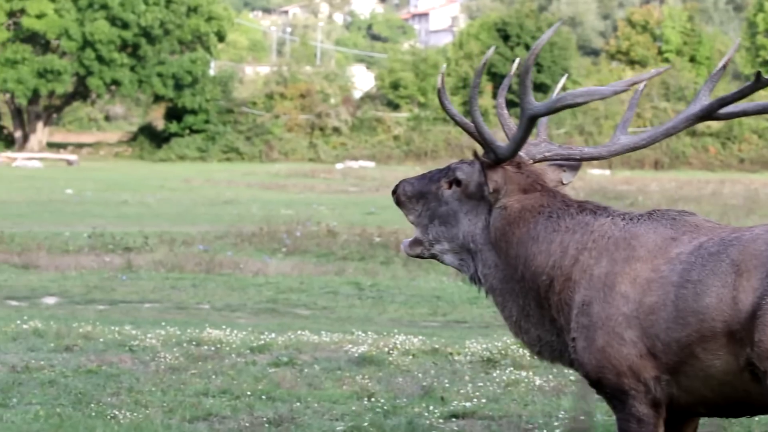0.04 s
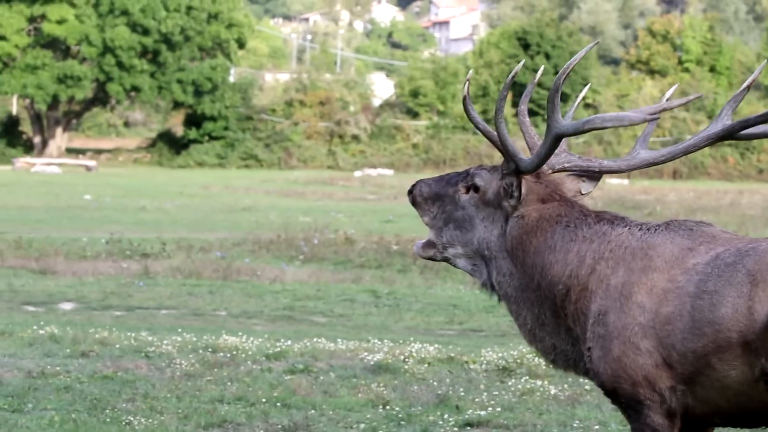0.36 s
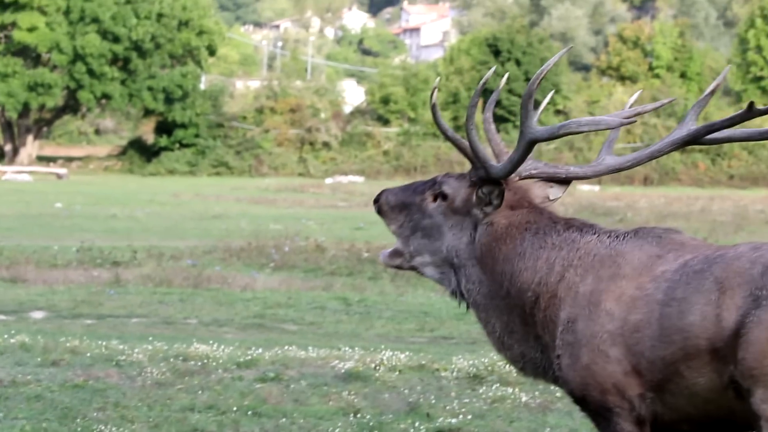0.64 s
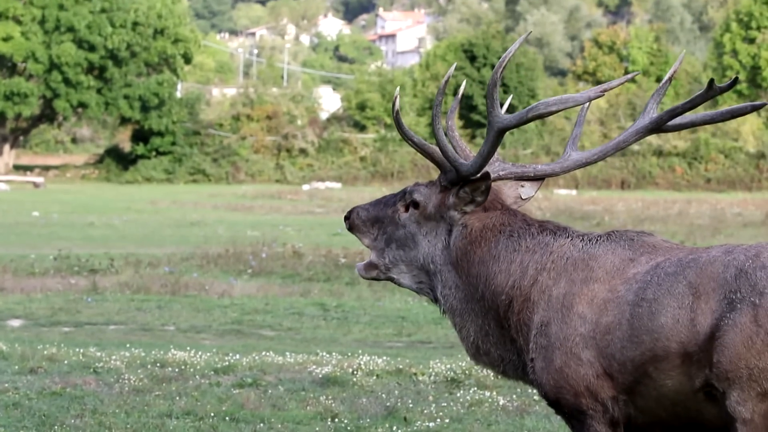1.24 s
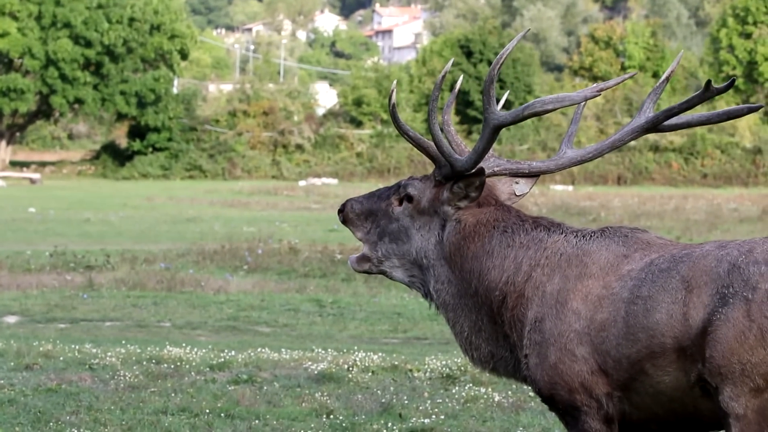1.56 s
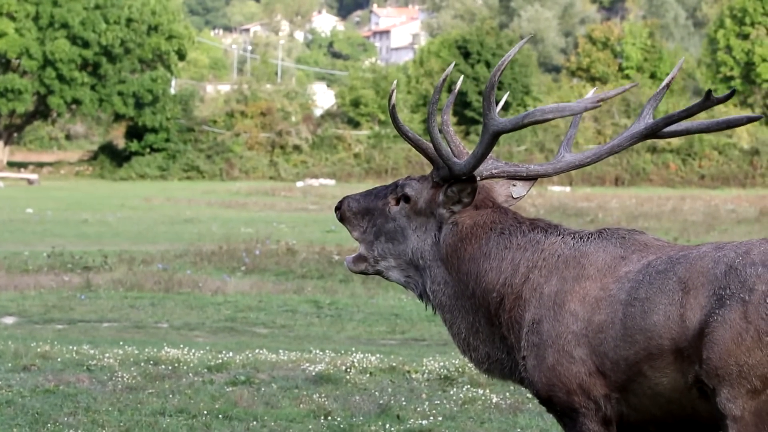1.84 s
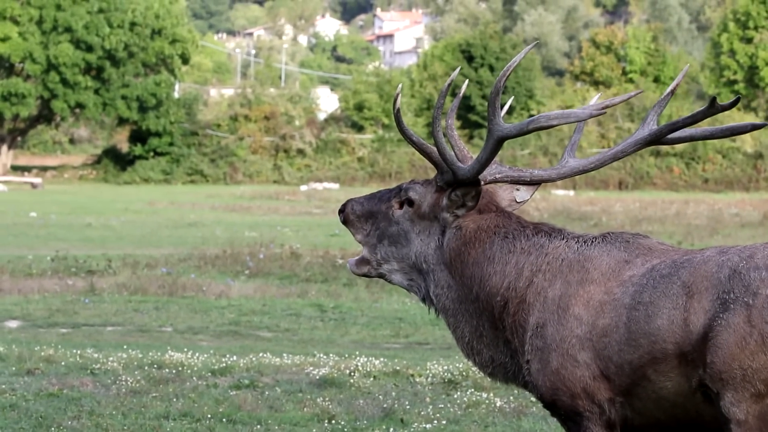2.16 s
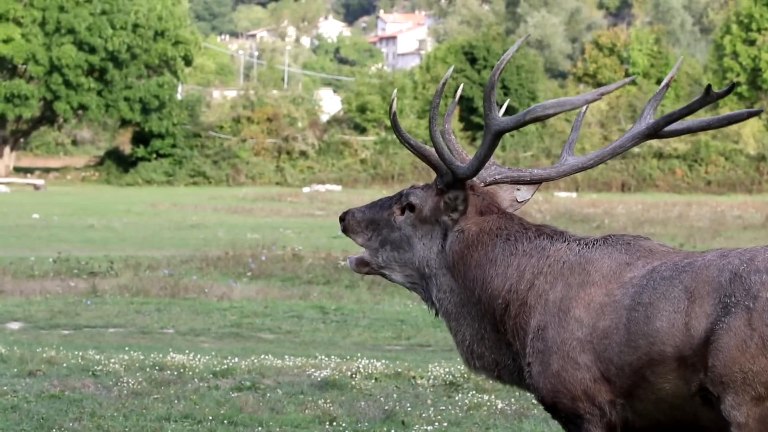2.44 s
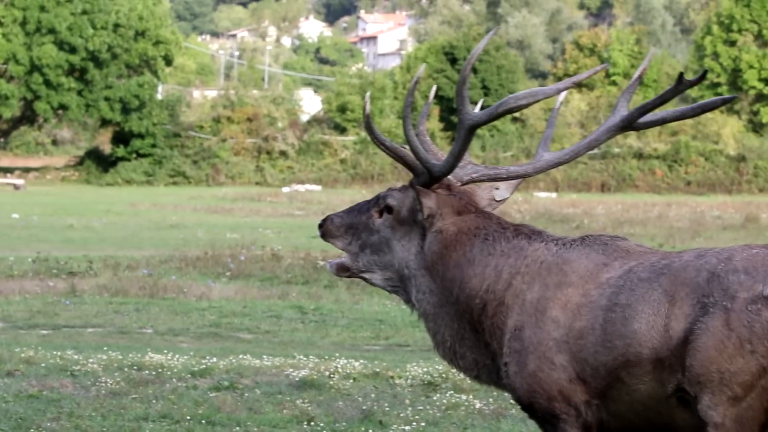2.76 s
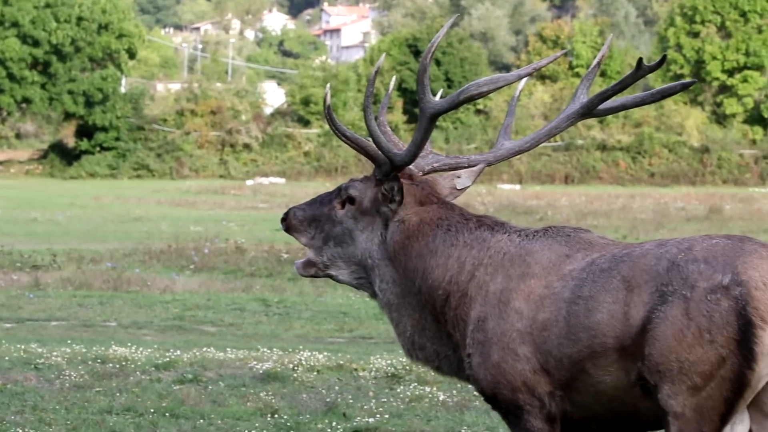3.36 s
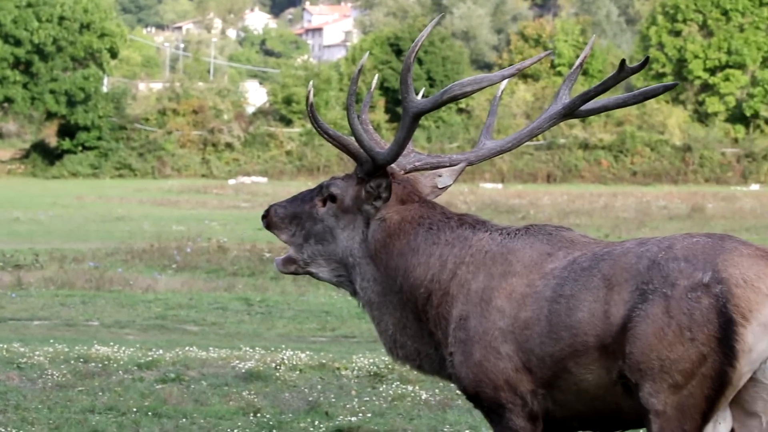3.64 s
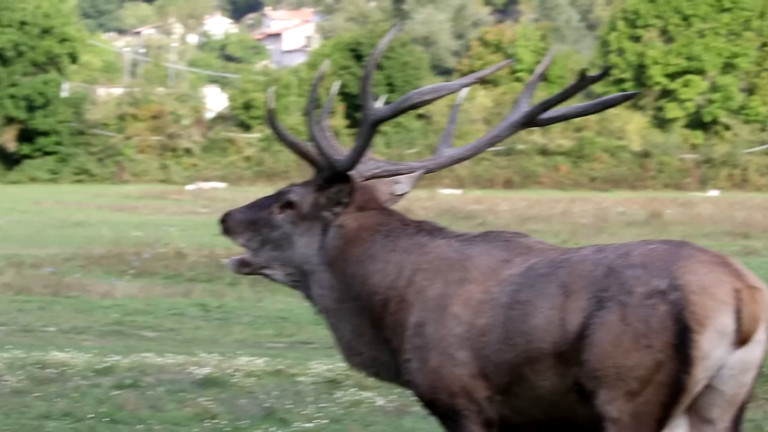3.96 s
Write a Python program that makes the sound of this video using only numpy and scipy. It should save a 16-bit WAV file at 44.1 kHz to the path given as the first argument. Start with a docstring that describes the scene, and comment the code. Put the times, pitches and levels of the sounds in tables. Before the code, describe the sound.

A stag close to the microphone gives three low, rough roars, each rising in pitch and sinking into a rattling grunt. They echo lightly across an open meadow, with faint birds and a soft wash of air behind.

```python
"""A red deer stag, close by and already in full voice, roars three times in an open meadow.
Source and filter: slow pulses of the vocal folds excite the resonances of a long throat, and each roar
arches in pitch and sinks into a rattling grunt. The wooded edge of the meadow echoes it. Small birds
whistle and chirp faintly, with two dry ticks and a far hoot, over the soft wash of still air."""
import sys
import numpy as np
from scipy import signal
from scipy.fft import rfft, irfft
from scipy.io import wavfile
from scipy.ndimage import uniform_filter1d

SR = 44100
rng = np.random.default_rng(int(sys.argv[2]) if len(sys.argv) > 2 else 0)


def transcribe(signal):
    """Save signal, clipped to [-1, 1], as a 16-bit WAV file at the path in sys.argv[1]."""
    frames = np.atleast_2d(signal).T
    limited = np.clip(frames, -1, 1)
    pcm = np.round(limited * 32767).astype(np.int16)
    wavfile.write(sys.argv[1], SR, pcm)


N = 176400
SIZE = 4096  # samples in the response to one pulse
HZ, T = np.fft.rfftfreq(SIZE, 1 / SR), np.arange(SIZE) / SR

# Pulse rate of the folds in each roar. Each row: time in seconds, pitch in Hz.
PITCH_1 = [(0, 94), (.256, 109.6), (.384, 113.1), (.468, 110.5), (.58, 98.9), (.7, 93.47), (.84, 90.78),
           (.885, 69.7), (.912, 58.1)]
PITCH_2 = [(1.242, 76.9), (1.298, 107.2), (1.338, 115.4), (1.44, 117), (1.61, 108.7), (1.75, 107.1),
           (1.97, 100.8), (2.062, 91.42), (2.234, 83.66), (2.335, 65.66)]
PITCH_3 = [(3.185, 77.7), (3.248, 112.2), (3.32, 114.9), (3.492, 104.1), (3.618, 99.23), (3.77, 101.1),
           (3.835, 87.23), (3.915, 57.4)]
# Loudness of each roar. Each row: time in seconds, then bass, middle and treble levels in dB.
LEVEL_1 = [(.05, -25, -24, -29.5), (0.239, -23.5, -20.5, -20.5), (.52, -23, -22.5, -21.5),
           (.62, -23, -24, -29.5), (0.871, -22, -24.5, -28.5)]
LEVEL_2 = [(1.4, -30.5, -25, -23), (1.559, -30.5, -21.5, -21.5), (1.899, -24, -22.5, -21),
           (2.08, -21.5, -24, -27.5), (2.31, -23.5, -23, -32)]
LEVEL_3 = [(3.35, -35.5, -31, -27), (3.481, -37.5, -27, -29), (3.59, -35, -26.5, -33.5),
           (3.81, -29, -24, -30), (3.88, -25, -29.5, -35.5)]
# Throat resonances in three postures. Each row: frequency in Hz, level within its band in dB.
STRETCHED = [(190, 5.5), (325, 0.5), (553, 0), (830, -11), (1000, -7.5), (1280, -9.5), (1600, 4.5),
             (1925, 6.5), (2250, -5.5), (2620, -5), (3020, -6.5), (3550, -22), (4100, -24.5)]
OPEN = [(215, -0.5), (330, -8), (680, 4.5), (900, 0), (1135, 1), (1440, -4), (1750, 3), (1900, 7),
        (2230, -5.5), (2630, -1), (3060, -6), (3600, -15.5), (4100, -15)]
SLACK = [(200, -3.5), (315, -9.5), (665, 4.5), (880, 3), (1190, 0), (1410, 4), (1610, -3), (1810, 4.5),
         (2220, -7.5), (2660, -1), (3000, -5.5), (3650, -14.5), (4100, -15.5)]

def stag():
    """Posture sets the formants: held in roar one, stretching in two, an upper pair falling in three."""
    raised = [(hz + 306 * (2500 < hz < 3400), db) for hz, db in SLACK]
    return (roar(PITCH_1, LEVEL_1, STRETCHED, STRETCHED, swell_s=.01, notch=.84)
            + roar(PITCH_2, LEVEL_2, OPEN, STRETCHED, change_s=(1.397, 2.06))
            + roar(PITCH_3, LEVEL_3, raised, SLACK, change_s=(3.3, 3.6), notch=.77))

def roar(pitch, level, first, last, change_s=(0, 1), swell_s=.17, notch=0):
    """Source-filter voice: each fold pulse and its puff of turbulent air ring the throat."""
    t = np.arange(pitch[0][0], pitch[-1][0], 1 / SR)
    cycles = np.cumsum(read(pitch, t)) / SR
    at = np.interp(np.arange(int(cycles[-1]) + 1), cycles, t)[:, None]  # pulse times
    hz, age = read(pitch, at), at - t[0]
    fry = vocal_fry(at, hz)
    power = throat(at, age, level, first, last, change_s, notch)
    breath = (.1 + .65 * fry) * np.sqrt(HZ / 1500)
    voice = minimum_phase(power) * (1 + breath * puffs(len(at), decay_s=.005)) / np.hypot(1, breath)
    swell = np.minimum((age + 1 / hz) / swell_s, 1)
    closing = amp(np.interp(at, (t[-1] - .047, t[-1]), (0, -14)))
    return pulse_train(voice * swell * closing + rasp(at), at, hz, fry)

def vocal_fry(at, hz, onset_hz=83.3, width_hz=1.78, breaks_s=(.56, 2.06, 2.2)):
    """The folds vibrate irregularly at low pitch and where the voice breaks: 0 is even, 1 is full fry."""
    slow = 1 / (1 + np.exp((hz - onset_hz) / width_hz))
    return np.maximum(slow, .35 * sum(moment(at, s) for s in breaks_s))

def pulse_train(spectra, at, hz, fry, jitter_s=.000373, shimmer_db=2.5, lag_s=.001775, lag_hz=960):
    """Superposition of the pulse responses; fry scatters their timing (jitter) and level (shimmer)."""
    lead = 256  # samples of room before each pulse
    place = abs(at + rng.standard_normal(at.shape) * jitter_s * fry ** 2) * SR
    lag_cycles = HZ * (place % 1 + lead) / SR
    # The treble rings as the folds close, just after the bass push.
    lag_cycles += lag_s * (HZ - lag_hz * np.arctan(HZ / lag_hz))
    gain = np.sqrt(SR / hz) * amp(rng.standard_normal(at.shape) * shimmer_db * fry)
    pulses = irfft(spectra * gain * np.exp(-2j * np.pi * lag_cycles))
    out = np.zeros(N + lead)
    for sample, pulse in zip(place.ravel(), pulses * signal.windows.tukey(SIZE, lead / SIZE)):
        add(out, int(sample) / SR, pulse)
    return out[lead:]

# Damping of the throat resonances, lowest first. Each entry: bandwidth in Hz.
BANDWIDTHS = np.array([81.6, 85.6, 85.3, 151, 119, 91, 129, 115.6, 176, 90, 192, 360, 269])
# Brief sharp ringing of the shifting throat. Each row: time in seconds, frequency in Hz, boost in dB.
RINGS = [(.53, 838, 7), (.77, 1276, 3.5), (1.55, 1125, 9), (1.648, 2572, 8), (1.999, 3171, 16.5),
         (2.241, 597, 9), (3.31, 1784, 8.5)]

def throat(at, age, level, first, last, change_s, notch):
    """Resonance of an air column: its power response at each pulse, moving between two postures."""
    blend = np.interp(at, change_s, (0, 1))
    tuning = 1 + .05 * np.exp(-age / .068)  # resonances start high and fall as the larynx drops
    formants = np.array([
        peak((f + blend * (f_end - f)) * tuning, width, db + blend * (db_end - db) + wander(at))
        for (f, db), (f_end, db_end), width in zip(first, last, BANDWIDTHS)])
    colour = 1 + sum(moment(at, s) * peak(f, 75, db) for s, f, db in RINGS)
    colour *= (1 - notch * peak(1420, 210, 0)) ** 2  # antiresonance of a side branch
    bands = formants[:2], formants[2:6], formants[6:]  # bass, middle, treble
    power = sum(unit_mean(band.sum(0) * colour) * amp(read(level, at, column=k + 1)) ** 2
                for k, band in enumerate(bands))
    return power / (1 + (101.7 / (HZ + 1)) ** 4) ** 2  # the mouth radiates little deep bass

def wander(at, spread_db=1.5, step_s=.09):
    """Slow random modulation in dB: a resonance of the soft throat waxes and wanes."""
    knots = np.arange(0, N / SR, step_s)
    return spread_db * np.interp(at, knots, rng.standard_normal(len(knots)))

# Strength of the rasp. Each row: time in seconds, level in dB.
RASP_LEVEL = [(.02, -56), (.2, -37), (.54, -41), (.6, -56), (1.28, -66.5), (1.5, -40.5), (1.68, -36.5),
              (1.98, -42.5), (2.05, -68), (3.35, -62), (3.74, -46), (3.85, -60.5)]
# Its drift in the treble. Each row: time in seconds, centre frequency in Hz.
RASP_CENTRE = [(.4, 6970), (1.4, 7730), (1.66, 7770), (1.82, 6605), (3.3, 7462)]
# Its resonances. Each row: multiple of the centre, width in Hz, relative level in dB.
RASP_PEAKS = [(1, 470, 2.5), (.88, 350, 1.5), (.7, 1300, -8), (1.16, 660, -9), (1.42, 3100, -24.5)]

def rasp(at):
    """Pulsed excitation of high resonances: a noisy burst with each beat of the folds."""
    centre = read(RASP_CENTRE, at)
    power = unit_mean(sum(peak(centre * ratio, width, db) for ratio, width, db in RASP_PEAKS))
    return minimum_phase(power) * (1 + .6 * puffs(len(at), decay_s=.002)) * amp(read(RASP_LEVEL, at))

# Echo of the wooded edge. Each row: frequency in Hz, time to decay 60 dB in seconds, level in dB.
WOODS = [(146, 0.58, -23), (596, 2.7, -23.5), (1670, 1.22, -14.5), (9000, 0.88, -12.5)]

def meadow(sound, build_s=.21, ground_db=-11):
    """Diffuse reflection: quick scatter from the ground, then a slow echo from the trees."""
    hz, t, noise = signal.stft(rng.standard_normal(2 * SR), SR, nperseg=512)
    build = 1 - np.exp(-(t / build_s) ** 2)
    decay = amp(-60 * t / read_hz(WOODS, hz)[:, None])
    envelope = unit(build * decay) * np.sqrt(len(t) / (2 * SR))
    gain = amp(read_hz(WOODS, hz, column=2))[:, None]
    echo = signal.istft(noise * envelope * gain, SR, nperseg=512)[1]
    add(echo, .003, amp(ground_db) * irfft(puffs(1, decay_s=.013))[0])
    return sound + signal.fftconvolve(sound, echo)[:N]

# Thin whistles. Each row: start and length in seconds, first and last pitch in Hz, level in dB.
WHISTLES = [(2.261, 0.53, 7440, 6950, -60.5), (2.951, 0.26, 7510, 7040, -50.5)]

def birds():
    """Frequency-modulated tones: one bird trills, a second gives three falling chirps."""
    out = np.zeros(N)
    for s, *shape in WHISTLES:
        add(out, s, note(*shape, trill_depth_hz=70))
    for s in (.81, .98, 1.12):
        add(out, s, note(length_s=.06, start_hz=6497, end_hz=4887, db=-62))
    return out

# Faint dry ticks. Each row: start in seconds, level in dB.
TICKS = [(2.378, -43.5), (2.458, -48.5)]

def ticks(decay_s=.0024):
    """Damped transients: very short noise bursts through one broad treble resonance."""
    out = np.zeros(N)
    resonance = minimum_phase(peak(6560, 5600, 0))
    for s, db in TICKS:
        burst = unit(irfft(resonance * puffs(1, decay_s)[0]))
        add(out, s, amp(db) * np.sqrt(SR * decay_s) * burst)
    return out

def far_hoot():
    """A nearly pure tone, faint and rising."""
    out = np.zeros(N)
    add(out, 2.565, note(length_s=.11, start_hz=610, end_hz=685, db=-42))
    return out

# Spectrum of still air. Each row: frequency in Hz, relative spectral density in dB.
AIR = [(20, -12), (175, 0), (580, 3.5), (1900, -3), (2830, -11.5), (13400, -23.5)]

def still_air(db=-47.5):
    """Stationary coloured noise: the soft wash of open country."""
    colour = amp(read_hz(AIR, np.fft.rfftfreq(N, 1 / SR)))
    wash = irfft(rfft(rng.standard_normal(N)) * colour, N)
    return amp(db) * np.sqrt(N) * unit(wash)

def note(length_s, start_hz, end_hz, db, trill_depth_hz=0, trill_hz=27.74, waver=.0115):
    """Frequency modulation: a gliding, slightly unsteady sine that swells and fades."""
    t = np.arange(0, length_s, 1 / SR)
    glide = start_hz + (end_hz - start_hz) * t / length_s
    trill = trill_depth_hz * np.sin(2 * np.pi * trill_hz * t)
    drift = unit(uniform_filter1d(rng.standard_normal(SR), size=200)[:len(t)]) * np.sqrt(len(t))
    hz = glide + trill + waver * start_hz * drift
    envelope = amp(db) * np.sqrt(2 * np.sin(np.pi * t / length_s))
    return envelope * np.sin(2 * np.pi * np.cumsum(hz) / SR)

def puffs(count, decay_s):
    """Spectra of exponentially decaying noise bursts."""
    return rfft(unit(rng.standard_normal((count, SIZE)) * np.exp(-T / decay_s)))

def peak(hz, width_hz, db):
    """Power response of a steep resonance."""
    return amp(db) ** 2 / (1 + (2 * (HZ - hz) / width_hz) ** 2) ** 2

def minimum_phase(power):
    """Causality: the spectrum with this power response that rings only after it is excited."""
    cepstrum = irfft(.5 * np.log(power + 1e-14))
    cepstrum[..., 1:SIZE // 2] *= 2
    cepstrum[..., SIZE // 2 + 1:] = 0
    return np.exp(rfft(cepstrum))

def moment(at, s, width_s=.075):
    """A Gaussian rise and fall around time s."""
    return np.exp(-((at - s) / width_s) ** 2)

def amp(db):
    """Decibels to gain."""
    return 10 ** (np.asarray(db) / 20)

def unit(x):
    """Scales each row to energy 1."""
    return x / np.sqrt((abs(x) ** 2).sum(-1, keepdims=True) + 1e-20)

def unit_mean(power):
    """Scales each power response to a mean of 1."""
    return power / power.mean(-1, keepdims=True)

def read(table, at, column=1):
    """Linear interpolation of one column."""
    table = np.array(table)
    return np.interp(at, table[:, 0], table[:, column])

def read_hz(table, hz, column=1):
    """Interpolation on a logarithmic frequency axis."""
    table = np.array(table)
    return np.interp(np.log(hz + 1), np.log(table[:, 0] + 1), table[:, column])

def add(mix, s, sound):
    """Mixes a sound in at s seconds."""
    part = mix[round(s * SR):][:len(sound)]
    part += sound[:len(part)]

def scene():
    """Superposition: the stag and the small sounds echo in the meadow, over still air."""
    return (meadow(stag() + birds() + ticks() + far_hoot()) + still_air())[None]

def record(dry, cutoff_hz=13650):
    """Band limiting: a steep low-pass filter removes the highest treble."""
    lowpass = signal.firwin(511, cutoff_hz, window=("kaiser", 9), fs=SR)
    return signal.oaconvolve(dry, lowpass[None], "same")

dry = scene()
out = record(dry)
transcribe(out)
```